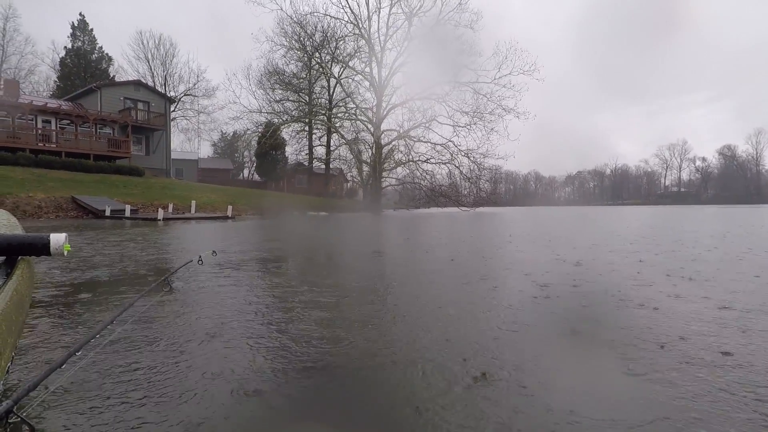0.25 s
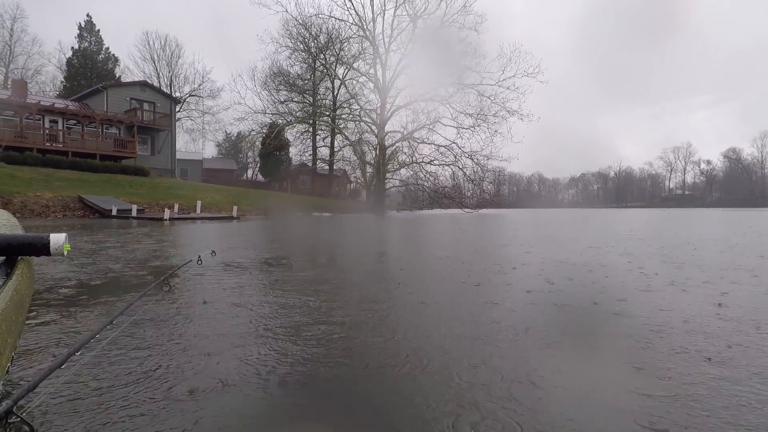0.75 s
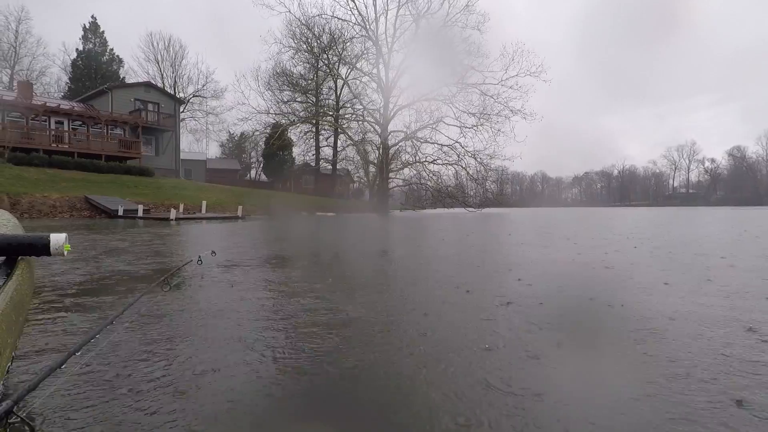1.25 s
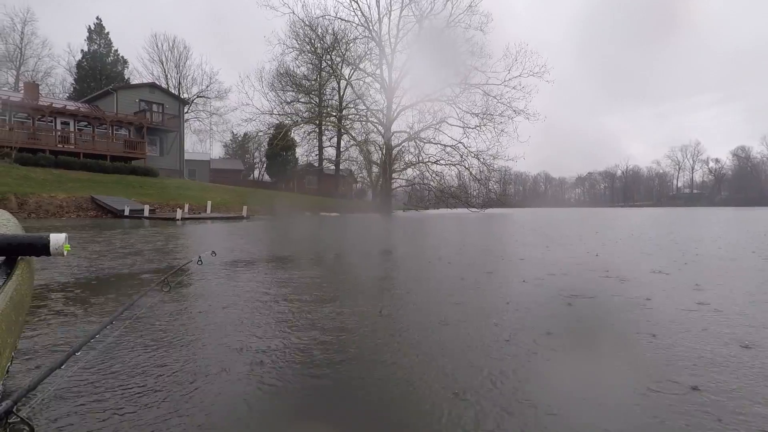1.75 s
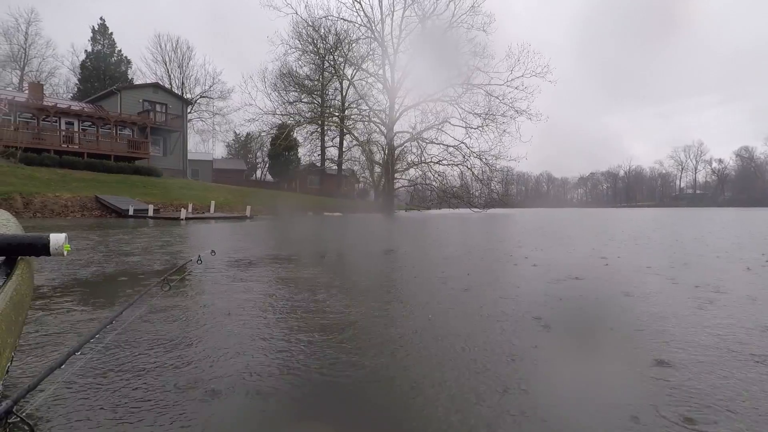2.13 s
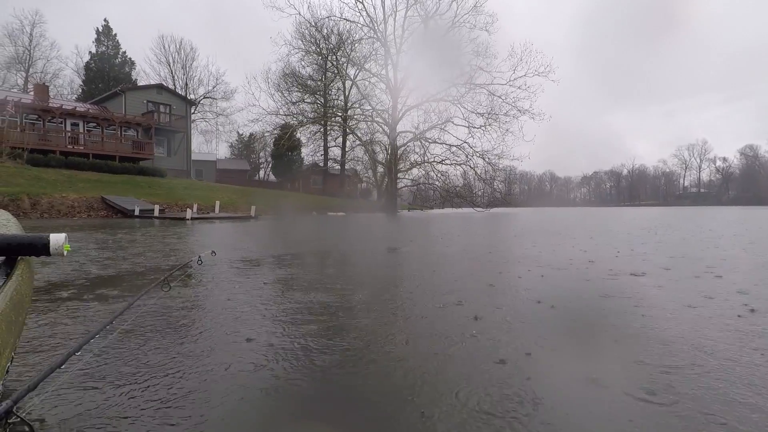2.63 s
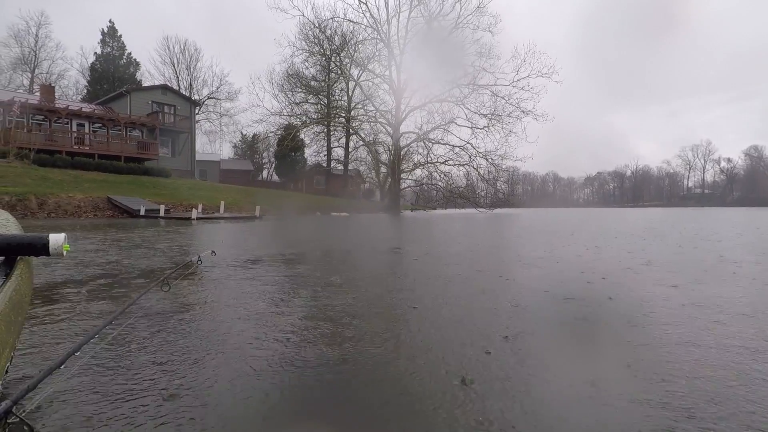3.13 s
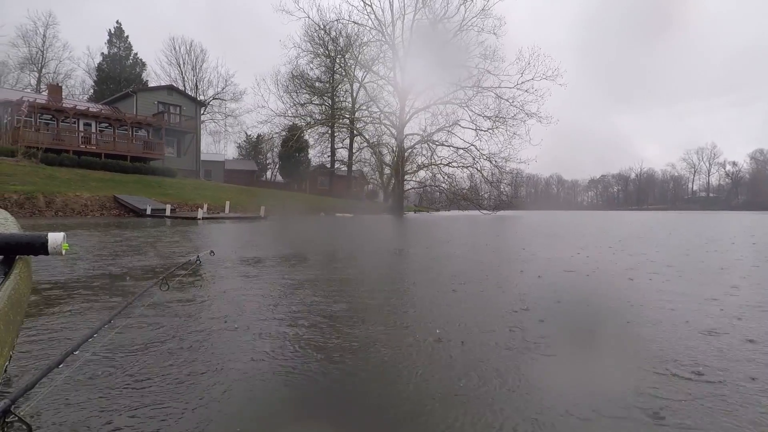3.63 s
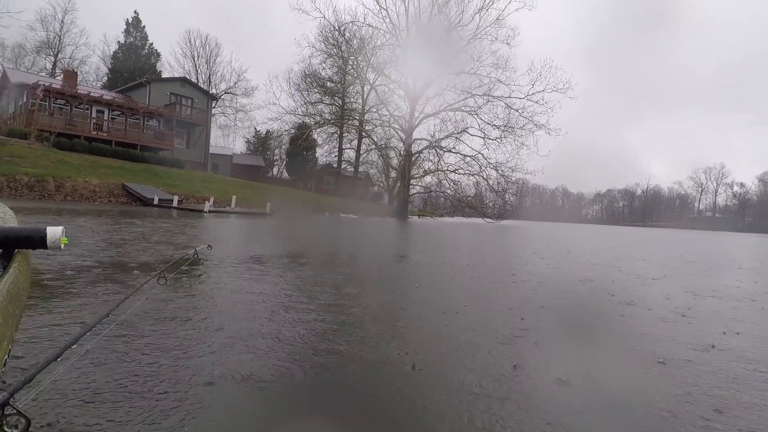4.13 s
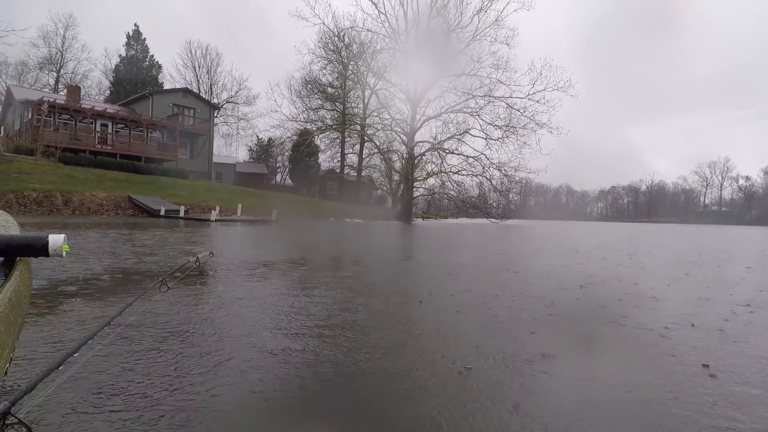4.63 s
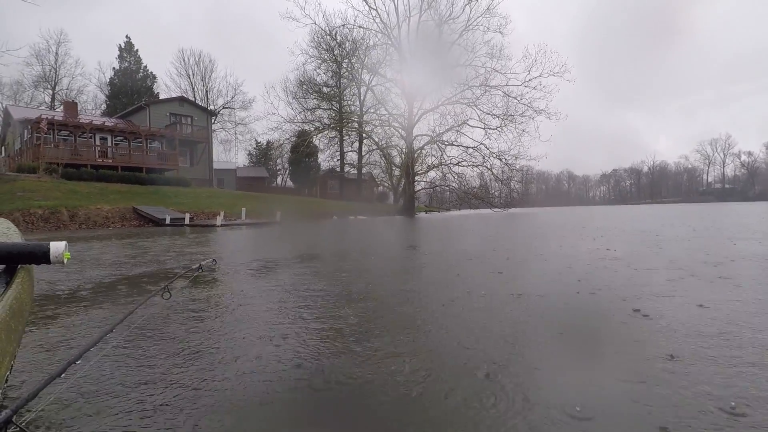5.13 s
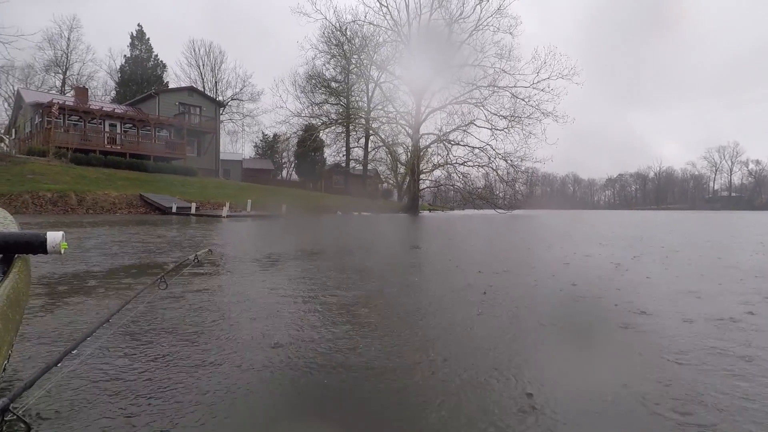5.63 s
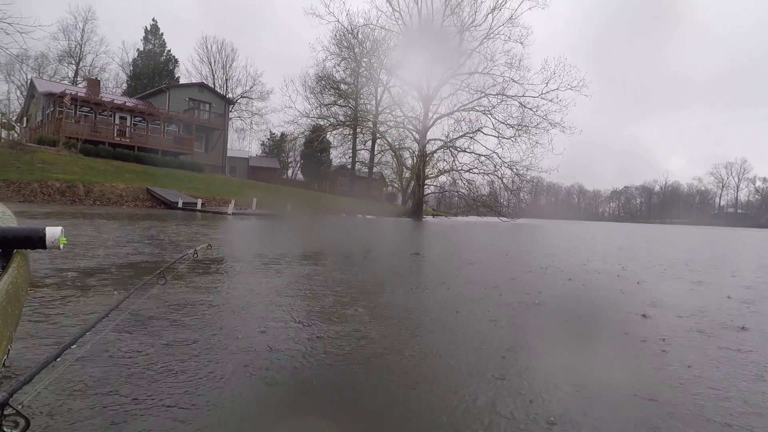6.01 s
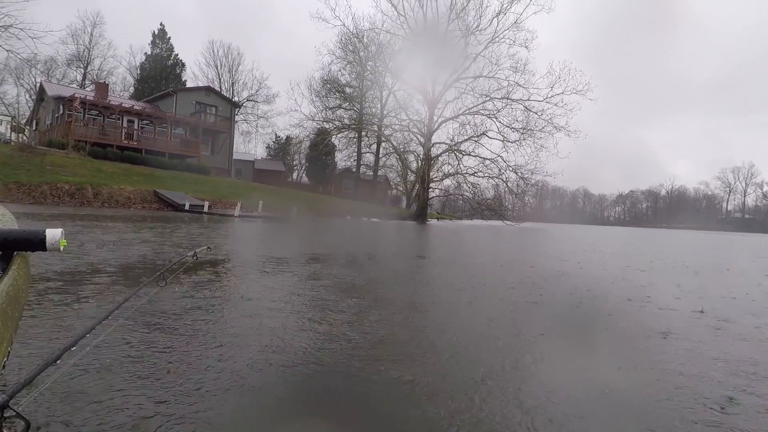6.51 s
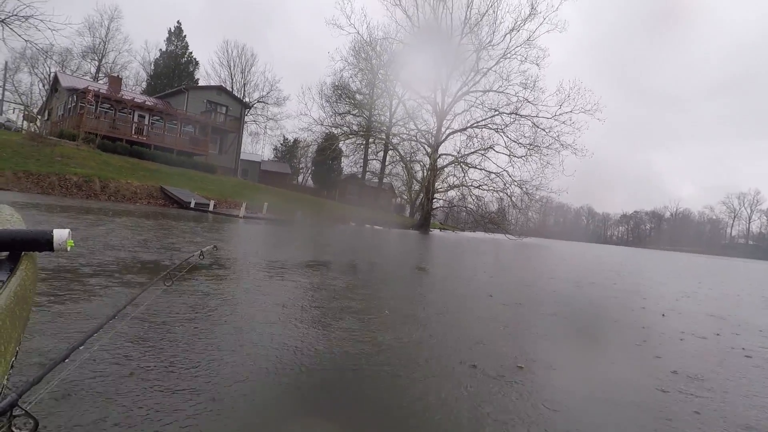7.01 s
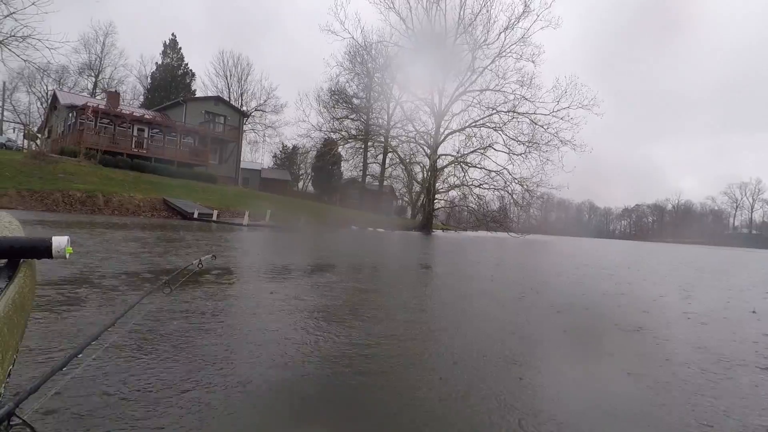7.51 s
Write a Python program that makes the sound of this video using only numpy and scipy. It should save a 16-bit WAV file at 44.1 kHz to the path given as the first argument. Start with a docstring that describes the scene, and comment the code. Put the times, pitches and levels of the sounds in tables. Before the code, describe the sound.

Steady rain hisses on a lake while drops tick sharply on a hard case around the microphones and wavelets thump and gurgle against a hollow kayak hull.

```python
"""Rain on a lake, heard from a kayak

A camera in a waterproof case hears the hiss of far rain, built from noise and clicks, and short pitched plinks.
Drops tick on the case and ring its walls; a few land right over the microphones and make a limiter duck the hiss.
Wavelets thump and gurgle against the hollow hull: clicks shake its resonances and short plops ring.
Small splashes hiss, a far bird whistles falling notes as bending sine tones, and a faint low rumble lies below."""
import sys
import numpy as np
from scipy import signal
from scipy.io import wavfile
from scipy.ndimage import uniform_filter1d, minimum_filter1d

SR = 44100
rng = np.random.default_rng(int(sys.argv[2]) if len(sys.argv) > 2 else 0)


def wav_out(sig):
    """Save sig, one row per channel (or a flat mono array), as 16-bit PCM at SR to the path in sys.argv[1]."""
    wavfile.write(sys.argv[1], SR, np.round(np.clip(np.atleast_2d(sig).T, -1, 1) * 32767).astype(np.int16))


N = 342657
TIME = np.arange(N) / SR
DROP_TIME = TIME[:2048]  # the short time axis of one drop


def from_db(db):
    """Turn decibels into a gain."""
    return 10 ** (np.asarray(db) / 20)


def rms_one(x):
    """Scale a sound to an rms level of 1."""
    return x / np.sqrt(np.mean(x ** 2) + 1e-20)


def fade(t, t60):
    """Die away by 60 dB in t60 seconds, as a freely ringing thing does."""
    return from_db(-60 * t / t60)


def at_hz(points, hz):
    """Read a table between its rows, with pitch on a logarithmic scale."""
    table = np.array(points)
    return np.interp(np.log(hz), np.log(table[:, 0]), table[:, 1])


def cut(x, hz, kind, order=2):
    """Filter away pitches; "high" keeps the highs, "low" the lows, "band" the middle."""
    safe_hz = np.clip(hz, 10, .45 * SR)
    return signal.sosfilt(signal.butter(order, safe_hz, kind, fs=SR, output="sos"), x + 1e-18)


def resonate(x, hz, width_hz):
    """Let a sound shake one resonance, with a gain of 1 at its peak."""
    r = np.exp(-np.pi * width_hz / SR)
    feed = np.array([1, 0, -1]) * (1 - r * r) / 2
    return signal.lfilter(feed, [1, -2 * r * np.cos(2 * np.pi * hz / SR), r * r], x + 1e-18)


def stereo(pair, likeness, pan_db=0):
    """Mix two unrelated signals into a left and right that are alike (1), unrelated (0) or opposed (-1)."""
    c = np.clip(likeness, -.98, .98)
    mid, side = np.sqrt(1 + c) * pair[0], np.sqrt(1 - c) * pair[1]
    return np.array([mid + side, mid - side]) * from_db([[pan_db / 2], [-pan_db / 2]])


def grains(per_s, spread_db):
    """Make two trains of random clicks, mostly small, a few large."""
    sizes = from_db(spread_db * np.minimum(rng.exponential(1, (2, N)), 4))
    happens = rng.random((2, N)) < per_s / SR
    return happens * sizes * rng.choice([-1, 1], (2, N))


def even(x, seconds):
    """Hold the short-term level of a stereo sound near 1."""
    power = uniform_filter1d(np.mean(x ** 2, axis=0), max(int(seconds * SR), 1))
    return x / np.sqrt(np.abs(power) + 1e-12)


def add(out, s, sound):
    """Mix a short stereo sound in at time s."""
    i = int(np.clip(s * SR, 0, N - 1))
    out[:, i:i + sound.shape[1]] += sound[:, :N - i]


# tone colour of the rain hiss; its overall level is set later: (pitch_hz, relative_level_db per Hz)
RAIN_SPECTRUM = [(200, 13), (500, 4.5), (700, 8), (1000, -4), (1300, 0.5), (2000, -3), (3000, -4.5),
                 (4400, -5.5), (6000, -11.5), (8000, -16), (10000, -17), (12000, -26.5), (14500, -29),
                 (16000, -67.5)]
# how alike the rain is at the two microphones: (pitch_hz, likeness from -1 to 1)
RAIN_LIKENESS = [(130, 0.1), (640, -0.68), (1410, 0.2), (3100, 0.5), (4500, 0.44), (6820, -0.4),
                 (15000, 0.21)]


def rain_on_lake(db=-41.5, near_per_s=160, spread_db=6, near_share=0.58):
    """Countless far drops merge into a hiss; nearer ones prickle through it as separate clicks."""
    edges_hz = np.geomspace(200, 16500, num=20)
    far, out = rng.standard_normal((2, 2, N)), 0
    for k, (low, high) in enumerate(zip(edges_hz, edges_hz[1:])):
        if k % 2 == 0:  # each pair of neighbouring bands shares its near drops
            near = near_share * rms_one(grains(near_per_s, spread_db))
        hz = np.sqrt(low * high)
        band = cut(far[k % 2] + near, [low, high], "band")
        placed = stereo(band, at_hz(RAIN_LIKENESS, hz), pan_db=0.7)
        out = out + from_db(at_hz(RAIN_SPECTRUM, hz)) * placed
    return from_db(db) * rms_one(out)


def plink(hz, cycles, behind, rise=0.38):
    """A small tone rings briefly, dies away and rises in pitch; the right side lags by behind rad."""
    phase = 2 * np.pi * hz * (DROP_TIME + rise * DROP_TIME ** 2) - np.array([[0], [behind]])
    return np.sin(phase) * fade(DROP_TIME, cycles / hz) * (1 - np.exp(-DROP_TIME * hz))


# short pitched plinks and bright ticks close by: (start_s, starting_pitch_hz, level_db)
CLOSE_PLINKS_AND_TICKS = [(0.3243, 4435, -31), (0.646, 1750, -27), (0.802, 3300, -23), (1.2, 1720, -26),
                          (3.081, 2000, -27), (3.107, 2420, -40), (3.359, 1730, -23.5), (4.101, 2020, -24),
                          (4.1308, 4070, -23.5), (4.8749, 5100, -25), (5.6687, 5700, -30),
                          (6.3394, 1390, -29), (6.381, 1750, -28), (6.4266, 1540, -24), (6.456, 1930, -29),
                          (6.8537, 3960, -22), (7.119, 5430, -23), (7.2127, 5730, -23.5),
                          (7.4398, 1870, -31), (7.4674, 5050, -20.5)]


def plinks_and_ticks(per_s=80, db=-41, spread_db=5.0, cycles=18, tilt_db=-3):
    """Short pitched plinks and bright ticks ring close by, over many shorter ones scattered at random."""
    out, draws = np.zeros((2, N)), rng.random(size=(1500, 5))
    for s, hz, near_db in CLOSE_PLINKS_AND_TICKS:
        add(out, s, from_db(near_db) * plink(hz, cycles=27, behind=0.9))
    for when, pitch, size, side, turn in draws[:int(per_s * N / SR)]:
        pan_db = np.array([[3], [-3]]) * (2 * side - 1)
        level_db = db + tilt_db * pitch + spread_db * min(-np.log(size), 3) + pan_db
        small = plink(1100 * 2 ** (2.5 * pitch), cycles, np.pi * (2 * turn - 1))
        add(out, when * N / SR, from_db(level_db) * small)
    return out


def wall_ring(hz, t60, behind):
    """A struck wall of the case rings; it moves the two microphones out of step (behind, in rad)."""
    phase = 2 * np.pi * hz * DROP_TIME - np.array([[0], [behind]])
    return np.sin(phase) * fade(DROP_TIME, t60) * (1 - np.exp(-DROP_TIME / 0.00027))


def lid(t60=0.0059, behind=0.73, spray_db=-9, spray_t60=0.036):
    """Two lid tones, shifted at random for where the drop lands, plus the wet smack of spreading water."""
    low_shift, high_shift = rng.normal(0, .05, 2)
    noise = rng.standard_normal((2, len(DROP_TIME)))
    smack = rms_one(cut(noise, [1100, 3000], "band")) * from_db(spray_db) * fade(DROP_TIME, spray_t60)
    low = wall_ring(2060 * np.exp(low_shift), t60, behind)
    high = wall_ring(2650 * np.exp(high_shift), t60, behind)
    return low + 0.49 * high + .5 * smack


# stiff resonances of the case: (pitch_hz, width_hz, relative_level_db)
CASE_MODES = [(4340, 1170, 13), (5580, 760, 14), (7140, 1060, 5)]


def splat(t60=0.017, broad_db=-7, top_hz=11500, crack_db=20):
    """The drop bursts with a crack and a few ms of spray, which shake the stiff resonances of the case."""
    spray = rng.standard_normal((2, len(DROP_TIME))) * fade(DROP_TIME, t60)
    spray[:, 0] += from_db(crack_db)
    modes = 0
    for k, (hz, width_hz, db) in enumerate(CASE_MODES):
        gain = (-1) ** k * from_db(db + rng.normal(0, 1))
        modes = modes + gain * resonate(spray, hz, width_hz)
    tick = cut(modes + from_db(broad_db) * cut(spray, 4000, "high"), top_hz, "low", order=3)
    return tick / np.sqrt(np.sum(tick ** 2) / (SR * 0.00023))  # every splat gets the same energy


def case_drop(hz, wall_db, lid_db, splat_db):
    """One drop rings a wall and the lid, and bursts."""
    wall = from_db(wall_db) * wall_ring(hz, t60=0.014, behind=2.205)
    return wall + from_db(lid_db) * lid() + from_db(splat_db) * splat()


def patter(per_s=32, wall_db=-32, lid_db=-35, splat_db=-38):
    """Small drops land all over the case; each shakes wall, lid and stiff parts in its own proportion."""
    out = np.zeros((2, N))
    times = np.cumsum(rng.exponential(1, size=500)) / per_s
    draws = np.clip(rng.normal(0, 1, size=(500, 5)), -1.6, 1.6)
    for s, (size, pitch, on_wall, on_lid, burst) in zip(times[times < N / SR], draws):
        hz = 1240 * np.exp(.2 * pitch)
        drop = case_drop(hz, wall_db + 3 * on_wall, lid_db + 3 * on_lid, splat_db + 3 * burst)
        add(out, s, from_db(2.5 * size) * drop)
    return out


SMEAR_LEAD_S, SMEAR_SWELL_S = .02, .004  # how early the filter's smear starts, how fast it swells


def thud(hz, low_cut_hz, cycles=4.0):
    """A low thud, alike at both microphones, that the recorder's filter smears to begin before the tick."""
    t = DROP_TIME - SMEAR_LEAD_S
    swing = np.where(t < 0, np.exp(t / SMEAR_SWELL_S), fade(t, cycles / hz))
    return np.tile(cut(np.sin(2 * np.pi * hz * t) * swing, low_cut_hz, "high", order=2), (2, 1))


# large drops on the case: (start_s, wall_pitch_hz, wall_level_db, lid_level_db, splat_level_db)
LARGE_DROPS = [(0.4701, 830, -17, -22.5, -33), (0.782, 1340, -19, -40, -22), (1.106, 1250, -24, -15.5, -24),
               (1.1441, 1250, -22.5, -23, -24.5), (1.2936, 1300, -12, -28, -17.5),
               (1.551, 1440, -11.5, -15, -47), (1.759, 1210, -14, -39, -34), (1.836, 1490, -43, -16.5, -38),
               (1.8803, 1290, -15, -27, -18.5), (2.197, 1180, -7.5, -11, -13.5),
               (2.2274, 1730, -18, -26, -23), (2.291, 1970, -12, -13.5, -38), (2.4444, 1000, -22, -24, -37),
               (2.597, 1130, -18, -21.5, -43.5), (2.986, 1340, -47.5, -21.5, -16.5),
               (3.068, 1250, -15.5, -27, -43), (3.3313, 1280, -18, -24, -34),
               (3.5537, 1340, -17.5, -24, -25), (3.7169, 1190, -7.5, -20, -26),
               (4.1085, 1630, -18.5, -30, -35), (4.386, 1320, -14, -21.5, -46),
               (4.6, 1300, -14.5, -42, -37), (4.7101, 1210, -14.5, -17, -20),
               (4.813, 1260, -17.5, -31, -38), (4.8489, 1870, -11.5, -25, -22),
               (4.99, 1280, -10.5, -13, -28), (5.339, 1270, -20, -18, -22),
               (5.597, 1360, -14.5, -37, -48.5), (6.0127, 1270, -10, -18.5, -17.5),
               (6.1096, 1350, -13.5, -23, -35), (6.417, 1170, -29, -34, -21), (6.5221, 1310, -8, -12.5, -9),
               (6.7295, 1300, -5.5, -14, -18), (7.0109, 1080, -13.5, -22, -28.5),
               (7.0613, 1290, -13, -23, -47), (7.3178, 960, -18, -11, -15.5),
               (7.5107, 1290, -23, -26.5, -26.5), (7.5826, 1190, -21.5, -24, -22),
               (7.6674, 1170, -11, -12.5, -14.5)]
# drops right over the microphones, levels before the limiter: (start_s, wall_level_db, wall_pitch_hz,
# wall_t60_s, right_side_lag_rad, lid_pitch_hz, lid_level_db, splat_level_db,
# thud_level_db, thud_pitch_hz, thud_low_cut_hz)
DIRECT_HITS = [(1.963, 41.5, 2125, 0.0032, 0.28, 2700, 34, 24, 4, 157, 81),
               (5.1407, 40.5, 870, 0.0031, 2.42, 1805, 28.5, 18, -3, 172, 140),
               (5.3873, 20, 960, 0.002, 2.48, 1640, -1, -6.5, -15, 222, 203),
               (7.0845, 11.5, 1280, 0.0065, 3.1, 2250, 7.5, -4, -21, 220, 300)]


def case_drops():
    """Large drops and direct hits stand out over the patter; the stiff walls carry no bass."""
    ticks, thuds = patter(), np.zeros((2, N))
    for s, hz, wall_db, lid_db, splat_db in LARGE_DROPS:
        add(ticks, s, case_drop(hz, wall_db, lid_db, splat_db))
    for (s, wall_db, hz, t60, behind, lid_hz, lid_db, splat_db,
         thud_db, thud_hz, low_cut_hz) in DIRECT_HITS:
        wall = from_db(wall_db) * wall_ring(hz, t60, behind)
        lid_tone = from_db(lid_db) * wall_ring(lid_hz, t60=0.0035, behind=0.8)
        burst = from_db(splat_db) * splat(t60=0.0045, broad_db=0)
        add(ticks, s, wall + lid_tone + burst)
        add(thuds, s - SMEAR_LEAD_S, from_db(thud_db) * thud(thud_hz, low_cut_hz))
    return cut(ticks, 190, "high") + thuds


# hull resonances: (pitch_hz, width_hz, relative_level_db, left_right_likeness from -1 to 1)
HULL_MODES = [(149.6, 15.6, 1.5, -0.0026), (226.8, 25, 2, -0.39), (251.2, 46, -4.5, 0.21),
              (328.5, 36, -5.5, -0.28)]


def hull_rumble(level_db):
    """Wavelets push on the hollow hull, which booms in its lowest resonances."""
    pushes, modes = grains(90, 2.0), 0
    for k, (hz, width_hz, db, likeness) in enumerate(HULL_MODES):
        gain = (-1) ** k * from_db(db) / np.sqrt(width_hz)
        modes = modes + gain * stereo(resonate(pushes, hz, width_hz), likeness, pan_db=-4.5)
    boom = cut(cut(modes, 146.0, "high", order=10), 400, "low", order=3)
    return from_db(level_db) * even(boom, 0.055)


def pocket(hz, ahead, cycles, swell_s=0.0005, rise=0.32):
    """A trapped air pocket swells, rings and rises a little in pitch; big ones ring longer."""
    t = TIME[:SR // 8]
    phase = 2 * np.pi * hz * (t + rise * t ** 2) + np.array([[0], [ahead]])  # right side ahead, in rad
    return np.sin(phase) * (1 - np.exp(-t / swell_s)) ** 2 * fade(t, cycles / hz)


# strength of the gurgle by pitch, including the case wall's ring near 1250 Hz: (pitch_hz, relative_level_db)
GURGLE_SPECTRUM = [(380, -6.5), (470, -10), (550, 0.5), (680, 2), (850, -16), (1250, 2.5), (1800, -13)]


def gurgle(level_db, soft_hz=1500):
    """Air pockets pinch off along the waterline in overlapping plops; the case wall rings along near 1250 Hz."""
    out = np.zeros((2, N))
    for when, pitch, size, turn in rng.random(size=(int(480 * N / SR), 4)):
        hz = 380 * (1800 / 380) ** (pitch ** 1.5)  # more low plops than high ones
        gain = from_db(at_hz(GURGLE_SPECTRUM, hz) + 9 * size)
        add(out, when * N / SR, gain * pocket(hz, np.pi * (.3 + .7 * turn), cycles=14))
    soft = cut(cut(out, 370, "high", order=3), soft_hz, "low", order=3)
    return from_db(level_db) * even(soft, 0.2)


def lapping(start_s, push_s, fall_db_per_s):
    """One wavelet swells, pushes, then drains away."""
    age = TIME - start_s
    attack_s = 0.025
    return np.clip(age / attack_s, 0, 1) * from_db(-fall_db_per_s * np.clip(age - push_s, 0, 1))


# wavelets lapping on the hull: (start_s, push_length_s, boom_level_db, gurgle_level_db)
WAVELETS = [(0.0, 0.027, -34, -44), (0.261, 0.024, -39.5, -42.5), (0.528, 0.067, -38, -37),
            (0.67, 0.037, -26.5, -48), (0.767, 0.25, -43, -44.5), (1.33, 0.081, -29, -47),
            (1.544, 0.2, -29, -38.5), (2.555, 0.019, -40, -32), (3.043, 0.13, -29, -41),
            (3.26, 0.026, -23, -40), (3.327, 0.033, -52, -35.5), (3.704, 0.021, -29, -35),
            (3.81, 0.05, -30.5, -30.5), (3.926, 0.17, -41, -43), (4.162, 0.029, -17.5, -34),
            (4.513, 0.33, -44, -40), (4.722, 0.12, -27.5, -38), (4.971, 0.038, -28, -33.5),
            (5.074, 0.052, -22.5, -32.5), (5.581, 0.023, -33, -31), (5.67, 0.017, -28, -35),
            (5.804, 0.21, -36, -43), (6.06, 0.31, -34, -42), (6.393, 0.22, -34, -41.5),
            (6.681, 0.086, -26, -37), (6.826, 0.11, -34, -48), (6.93, 0.073, -25, -37),
            (7.008, 0.3, -24.5, -34), (7.308, 0.033, -42, -26.5), (7.425, 0.06, -28.5, -36.5),
            (7.668, 0.056, -29, -40)]


def waves_on_hull():
    """Each wavelet booms and gurgles; its power adds to that of ripples that never stop."""
    boom, air = from_db(-42.5) ** 2, from_db(-49) ** 2  # power of the ripples
    for s, push_s, boom_db, gurgle_db in WAVELETS:
        boom = boom + (from_db(boom_db) * lapping(s, push_s, fall_db_per_s=122.5)) ** 2
        # the gurgle dies away faster than the boom
        air = air + (from_db(gurgle_db) * lapping(s, push_s, fall_db_per_s=183)) ** 2
    return hull_rumble(10 * np.log10(boom)) + gurgle(10 * np.log10(air))


# air pockets trapped under the hull, levels before the low cut and pan: (start_s, level_db, starting_pitch_hz)
PLOPS = [(.588, -15.5, 746), (0.591, -23.5, 338), (.688, -20.5, 253), (0.787, -19, 705), (.975, -21.5, 646),
         (1.36, -18, 175), (1.555, -11, 310), (1.554, -15, 646), (1.619, -20, 232), (2.596, -18, 546),
         (3.038, -16.5, 270), (3.039, -20, 520), (3.153, -21, 184), (3.276, -3.5, 322), (3.864, -13.5, 614),
         (3.89, -19, 590), (4.159, -22, 503), (4.158, -21, 302), (4.182, -39, 222), (4.192, -14, 166),
         (4.231, -18, 200), (4.384, -22, 528), (4.784, -20, 199), (4.993, -20, 269), (5.087, -19.5, 250),
         (5.107, -14, 296), (5.617, -16, 308), (6.288, -16, 149), (6.716, -20, 164), (7.01, -16.5, 224),
         (7.061, -13, 600), (7.075, -16, 232), (7.233, -20, 220), (7.386, -23, 656)]


def plops(ahead=1.79, slap_db=-19, slap_t60=0.037):
    """A wavelet hits the hull with a rough, wet slap and traps a large pocket of air."""
    out = np.zeros((2, N))
    froth = rms_one(cut(cut(grains(3000, 2.0), [350, 1500], "band"), 2200, "low"))
    for s, db, hz in PLOPS:
        ring = pocket(hz, ahead, cycles=22)
        i, n = int(s * SR), ring.shape[1]
        slap = froth[:, i:i + n] * fade(TIME[:n], slap_t60)
        add(out, s, from_db(db) * (ring + from_db(slap_db) * slap))
    return cut(out, 140.0, "high", order=8) * from_db([[-1.5], [1.5]])


# small splashes beside the boat: (start_s, decay_s to 37 percent, starting_level_db)
SPLASHES = [(3.699, 0.014, -34), (3.802, 0.036, -37)]


def splashes():
    """Short sprays of fine droplets, made of high clicks, start at once and fade."""
    level = 0
    for s, decay_s, db in SPLASHES:
        level = level + from_db(db) * (TIME >= s) * np.exp(-np.abs(TIME - s) / decay_s)
    return level * rms_one(cut(grains(650, 1.7), [4500, 7000], "band", order=3))


# bird notes, level before flutter and fades: (start_s, crest_pitch_hz before waver, level_db)
BIRD_NOTES = [(1.68, 3550, -47), (2.27, 3550, -52), (3.66, 3450, -55), (3.97, 3500, -53), (5.42, 3530, -53)]


def bird(echo_db=-12, flutter_db=3):
    """Thin far whistles arch over a crest and slide down, fading in and out, with faint echoes off the shore."""
    note_s, crest_s, bend_s, sag_hz_per_s = .33, .07, .06, 1700
    out, t = np.zeros((2, N)), TIME[:int(note_s * SR)]
    # a rounded crest, then a nearly steady slide down
    sag_hz = sag_hz_per_s * (np.hypot(t - crest_s, bend_s) - bend_s)
    swell = np.sin(np.pi * t / note_s) ** .7
    knots = np.linspace(0, note_s, num=14)
    for s, hz, db in BIRD_NOTES:
        waver, flutter = (np.interp(t, knots, row) for row in rng.normal(size=(2, 14)))
        phase = 2 * np.pi * np.cumsum(hz - sag_hz + 9 * waver) / SR + np.array([[0], [.8]])
        note = from_db(db + flutter_db * flutter) * np.sin(phase) * swell
        add(out, s, note)
        for delay_s in rng.uniform(.02, .12, size=3):
            add(out, s + delay_s, from_db(echo_db) * note)
    return out


def far_rumble(db=-69, top_hz=130):
    """The faint low bed of the open air is deep noise, partly alike on both sides."""
    noise = cut(rng.standard_normal((2, N)), top_hz, "low")
    return from_db(db) * rms_one(stereo(noise, 0.4))


def scene():
    """Rain all round, the hull below, drops on the case itself, a bird far off."""
    water = waves_on_hull() + plops() + splashes()
    return water + rain_on_lake() + plinks_and_ticks() + case_drops() + bird() + far_rumble()


def release(over_db, db_per_s):
    """Let each peak sink at a steady rate until a higher one comes."""
    return np.maximum.accumulate(over_db + db_per_s * TIME) - db_per_s * TIME


def limit(x, top_db, hold_s, fast_db_per_s, slow_share, slow_db_per_s, size):
    """Duck just ahead of a peak (by about size samples), hold, then recover quickly and at last slowly."""
    peak_db = 20 * np.log10(np.abs(x).max(axis=0) + 1e-9)
    over_db = np.maximum(peak_db - top_db, 0)
    hold = 2 * int(abs(hold_s) * SR / 2) + 1
    held_db = -minimum_filter1d(-over_db, hold, origin=hold // 2)
    duck_db = np.maximum(release(held_db, fast_db_per_s), release(slow_share * held_db, slow_db_per_s))
    smooth_db = uniform_filter1d(-minimum_filter1d(-duck_db, size), size)
    return x * from_db(-smooth_db)


def record(dry):
    """Limit lows and highs separately, clip at full scale, and cut the very top."""
    split_hz, cutoff_hz = 380, 16600
    low, high = (cut(cut(dry, split_hz, kind), split_hz, kind) for kind in ("low", "high"))
    low = limit(low, top_db=-11.5, hold_s=0.0026, fast_db_per_s=697,
                slow_share=0.27, slow_db_per_s=3.0, size=151)
    high = limit(high, top_db=3.0, hold_s=0.038, fast_db_per_s=160,
                 slow_share=0.34, slow_db_per_s=10.0, size=25)
    clipped = np.clip(low + high, -1, 1)
    return signal.sosfilt(signal.cheby2(12, 70, cutoff_hz, fs=SR, output="sos"), clipped)


dry = scene()
out = record(dry)
wav_out(out)
```